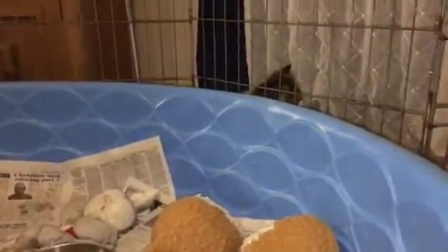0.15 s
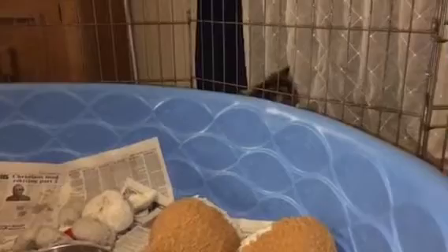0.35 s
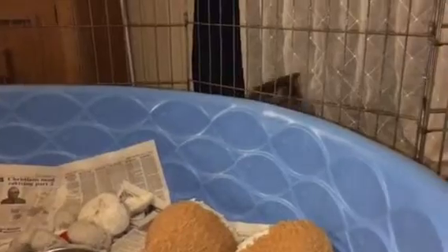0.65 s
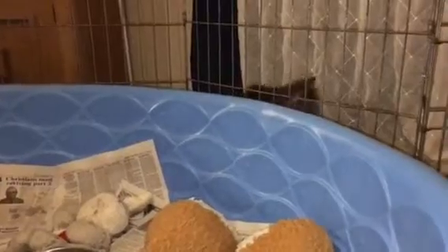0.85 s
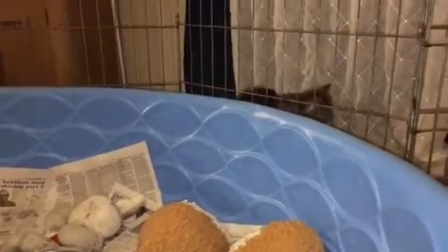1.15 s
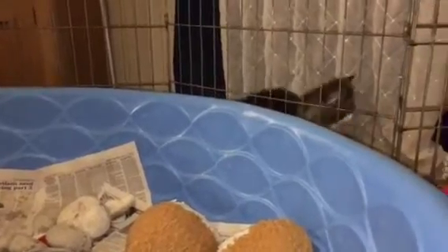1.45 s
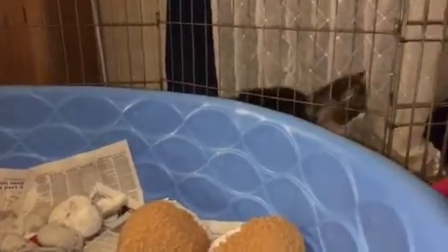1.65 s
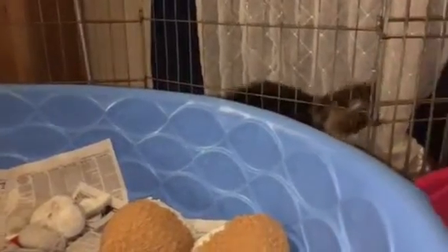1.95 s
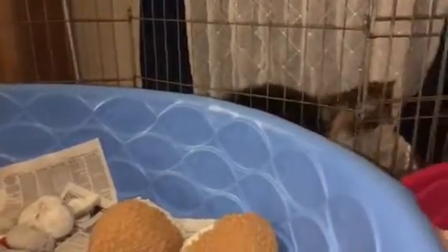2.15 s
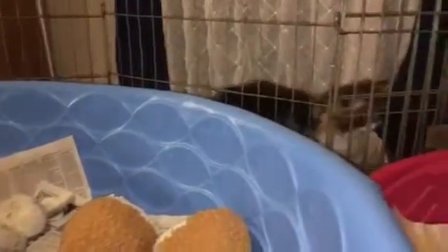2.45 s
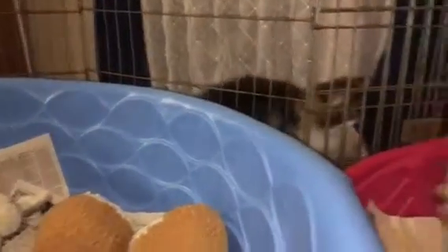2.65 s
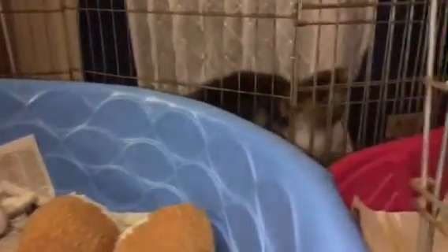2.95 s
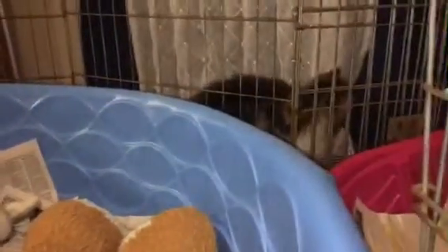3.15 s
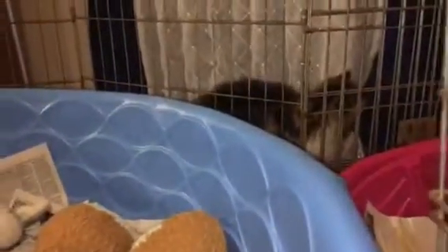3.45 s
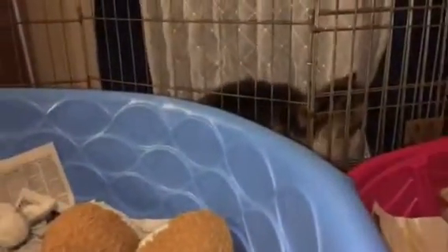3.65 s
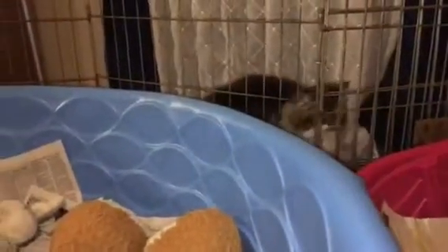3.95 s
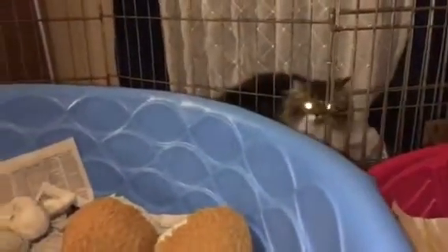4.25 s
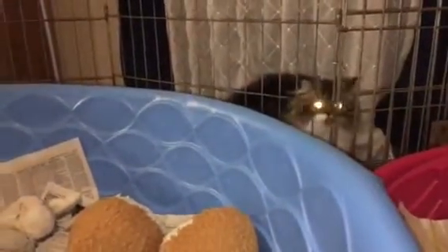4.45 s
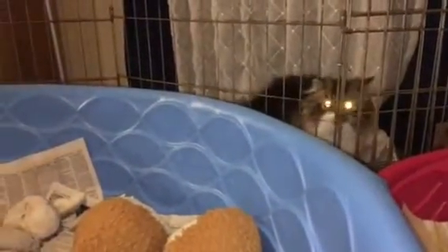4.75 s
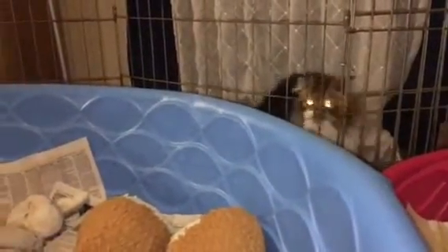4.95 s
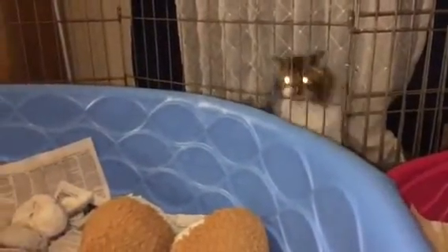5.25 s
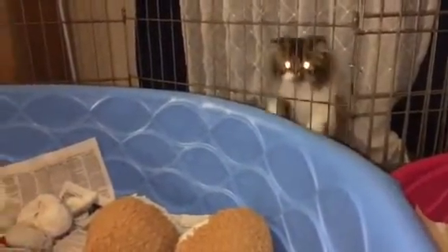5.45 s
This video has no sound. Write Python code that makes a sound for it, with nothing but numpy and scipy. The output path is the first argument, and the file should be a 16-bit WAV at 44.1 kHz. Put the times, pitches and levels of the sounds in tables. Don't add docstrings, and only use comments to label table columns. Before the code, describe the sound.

Small animals move unseen on newspaper in a plastic pool indoors. Dry crackles and grainy rustles come thick at first, with soft low thumps and hollow pats. One sharp plastic knock stands out soon after one second. Activity then thins to light rubs and ticks, with a brief crackle later, over faint low hum. A close phone microphone catches it in a small room.

```python
import sys
import numpy as np
from scipy import signal
from scipy.fft import rfft, irfft, next_fast_len
from scipy.io import wavfile
from scipy.ndimage import uniform_filter1d

SR = 44100
rng = np.random.default_rng(int(sys.argv[2]) if len(sys.argv) > 2 else 0)


def store_pcm(level_fs):
    pcm = np.round(np.clip(level_fs, -1, 1) * 32767).astype(np.int16)
    wavfile.write(sys.argv[1], SR, np.atleast_2d(pcm).T)


def voltage_ratio(decibels):
    exponent = np.asarray(decibels, float) / 20
    return 10 ** exponent


N = 246959

# peak_s, level_db, rise_ms, fall_ms, stack_drag_db
SHUFFLES = [(.06, -61.5, 210, 390, -1), (0.316, -49, 39, 145, -2), (.495, -52.5, 41, 66, -5),
            (.67, -62.5, 460, 37, 1.5), (0.819, -55.5, 84, 123, 5), (0.956, -54, 45, 104, -4),
            (1.193, -62.5, 270, 190, 0), (1.428, -61.5, 350, 79, 6.5), (1.643, -55, 27, 275, 0),
            (2.218, -66.5, 370, 57, 0.5), (2.31, -67.5, 94, 450, -4), (2.4, -63.5, 77, 310, -8),
            (.72, -55, 28, 47, 3), (2.49, -68.5, 140, 120, 4.5), (3.278, -71.5, 25, 790, 2.5),
            (3.55, -79, 370, 300, -11), (3.795, -63.5, 270, 190, -3), (3.981, -64, 260, 75, -1.5),
            (4.262, -77, 530, 320, -15), (4.52, -83, 48, 91, -4), (4.6, -77, 82, 120, 0),
            (4.77, -77, 40, 150, -5.5), (5.509, -73, 24, 83, 1), (5.15, -72, 80, 37, 1),
            (2.45, -69, 56, 140, -6), (5.2, -70.5, 126, 89, 5), (5.597, -75.5, 130, 100, 5)]
# peak_s, level_db, rise_ms, fall_ms, fibre_share_db
BRUSHES = [(.05, -63.5, 400, 470, -1.5), (.314, -55, 105, 160, -1.5), (.495, -54, 106, 100, -6.5),
           (.82, -61, 280, 88, -4.5), (.958, -61.5, 100, 110, -3.5), (1.0, -60.5, 200, 14, 0),
           (1.191, -59, 74, 220, -7), (1.428, -60.5, 77, 91, -30), (1.57, -66, 94, 68, -3),
           (1.646, -55.5, 63, 150, -0.5), (2.3, -63.5, 110, 290, -3.5), (2.499, -63, 260, 13, 0.5),
           (2.68, -62.5, 170, 65, -10), (3.212, -60.5, 240, 254, -3.5), (3.67, -61, 100, 120, 0.5),
           (3.795, -62, 300, 180, 0.5), (3.96, -67.5, 270, 230, 1.5), (4.3, -75, 370, 210, 1),
           (4.62, -79, 110, 120, -1), (4.975, -76, 180, 900, -1), (5.285, -68.5, 76, 70, -1),
           (5.2, -67.5, 60, 60, -6), (2.399, -61, 100, 93, -3.5), (4.71, -75.5, 25, 60, -11.5),
           (5.41, -75.5, 60, 72, 1)]
# peak_s, level_db, fall_ms, crisp_share_db, fibre_share_db
JERKS = [(0.143, -51, 65, -3, -0.5), (0.387, -35.5, 28.6, -10, -13), (0.689, -40.5, 40, -3.5, -26),
         (1.485, -60, 61, 11.5, 3), (1.607, -53, 74, -0.5, -2), (1.878, -58.5, 125, -2.5, -5),
         (2.633, -60.5, 57, 5.5, -1.5), (2.718, -72, 400, -14, -27), (2.981, -66, 280, 0, -8),
         (4.695, -61, 21, -10.5, -27), (2.691, -67.5, 21, 5, -10), (5.341, -62.5, 73, 3, -2)]
# sheet_db, crisp_db, fibres_db, stack_db
RESTING_DB = (-81.5, -84.5, -99, -76.5)
# hz, level_db_per_hz
SHEET_COLOUR = [(300, -41), (1000, -8), (1700, 2), (2500, -1), (3500, -6.5), (5000, -10), (8000, -18)]
CRISP_COLOUR = [(2000, -7), (3500, 4), (5000, 2), (7000, -2), (9000, -33.5), (12000, -58.5)]
FIBRE_COLOUR = [(4000, -21), (7500, 1.5), (9500, 4.5), (12500, 0.5), (15800, -3)]
STACK_COLOUR = [(200, 0), (450, -8), (800, -8), (1300, -10), (2500, -50)]
# peak_s, level_db, rise_ms, fall_ms, pitch_hz
CUPPED = [
    (2.3, -58.5, 31, 170, 2540),
    (2.385, -57, 61, 190, 2960),
    (3.5, -77, 190, 130, 5900),
    (2.74, -69.5, 130, 100, 1400),
    (3.22, -63, 98, 90, 4300),
    (3.4, -78, 60, 22, 3200),
    (4.2, -73, 20, 80, 1600),
    (2.3, -60, 23, 60, 1700),
]
# start_s, peak_db, centre_hz, treble_share_db, breadth_octaves
TEARS = [(0.1271, -31.5, 2740, -9, 0.58), (.184, -40, 4250, -8, 0.42), (0.3823, -22, 2550, -6, 0.83),
         (0.6834, -27.5, 3660, -14, 0.3), (0.6917, -30, 1700, 2, 0.85), (0.728, -38, 2140, -21, 0.29),
         (1.0067, -44, 4540, -23, 0.76), (1.1812, -34, 4280, -22.5, .5), (1.4198, -40, 1640, -26, 1),
         (1.871, -37, 2260, -35, 0.94), (2.4115, -38.5, 2200, -29, 0.4), (2.5274, -38, 2400, -19, 0.79),
         (2.5927, -39, 2480, -21, 0.57), (2.631, -41.5, 3500, -20, 0.9), (2.9669, -43, 2870, -20, 0.43),
         (3.6631, -30.5, 2380, 1, .99), (3.7868, -36, 1700, -26, .99), (3.884, -38.5, 2050, -9, 0.94),
         (4.2582, -50.5, 1320, -24.5, 0.39), (5.3362, -41.5, 6140, -16, 0.24),
         (5.4974, -44.5, 1850, -22, 0.84)]
# start_s, peak_db, centre_hz, treble_share_db, breadth_octaves
SNAPS = [(0.0716, -34.5, 2950, -18, 0.38), (0.1502, -35.5, 2240, -28, 0.38), (.258, -37.5, 3500, -22, 0.79),
         (0.3088, -30, 3540, -17, 0.28), (.3256, -28.5, 4170, -21, 0.65), (0.357, -39, 2000, -23, 0.65),
         (0.388, -22.5, 3060, -21, 0.41), (0.4846, -30, 3710, -5, 0.95), (0.5384, -33.5, 3960, -11, 0.57),
         (0.975, -42, 3270, -21, 0.3), (1.216, -26.5, 2120, -15, 0.74), (1.2508, -22.5, 4850, -5.5, 0.26),
         (1.444, -39.5, 1880, -26, 1.1), (1.4785, -23, 5040, -34, 0.69), (1.63, -30, 2220, -24, 0.96),
         (1.69, -27.5, 2780, -19, 0.42), (1.8888, -28.5, 2550, -32, 0.94), (1.911, -40.5, 3250, -12, 0.27),
         (2.4756, -36, 2400, -15, 0.45), (3.8229, -31, 4000, 0, 0.85), (0.695, -29.5, 2400, -16, 0.33),
         (.707, -46, 3200, -19, 0.55), (.718, -44, 2200, -20, 0.53), (2.5926, -38.5, 4500, -19, 0.27),
         (2.967, -43.5, 3280, -16, 0.84), (3.8236, -40.5, 960, -42, 0.69), (3.7883, -46, 854, -40, .6),
         (5.267, -40.5, 1884, -42, 1.1), (4.689, -39.5, 6360, -30, 0.47), (.152, -43, 6500, -10, 0.3),
         (3.928, -39, 4700, -17, 0.5), (4.6887, -37.5, 3500, -19, 0.35), (5.2655, -35.5, 5600, -21.5, 0.47)]
# start_s, peak_db, centre_hz
TICKS = [(.0044, -43, 3280), (0.095, -44, 3980), (0.191, -40.5, 2330), (0.292, -42, 3260),
         (0.99, -46.5, 4500), (1.927, -47, 2840), (1.2982, -45.5, 1520), (1.373, -44.5, 3660),
         (1.605, -45, 2260), (2.195, -48.5, 2600), (2.8772, -54, 3500), (3.271, -47, 1860),
         (3.7278, -49, 1880), (3.7748, -49.5, 1500), (3.964, -48.5, 1650), (4.238, -55, 3300),
         (0.03, -51, 3600), (0.082, -47, 2100), (0.133, -39.5, 3500), (0.2603, -45.5, 1900),
         (0.373, -47, 3500), (.397, -32.5, 3540), (0.616, -51, 1500), (0.7965, -49, 903),
         (0.952, -37.5, 2090), (1.108, -49.5, 1080), (1.3423, -54, 840), (1.78, -51, 1800),
         (1.947, -54, 1350), (2.0985, -53, 3600), (2.108, -54, 2500), (2.157, -55, 1340),
         (2.378, -47, 3790), (2.49, -60, 3000), (2.6372, -43, 1730), (2.9546, -57, 1040),
         (3.027, -50, 2020), (3.3046, -52, 1660), (3.6106, -54, 5300), (3.81, -43, 2600),
         (3.916, -53, 1690), (3.933, -52, 1000), (3.963, -47, 5500), (4.172, -57, 1540), (4.2403, -57, 910),
         (4.266, -58, 2470), (4.567, -58, 1630), (4.7595, -66, 1190), (5.246, -58, 1810),
         (5.588, -57, 1500), (5.596, -61, 2000)]
# start_s, peak_db, centre_hz, treble_share_db, breadth_octaves
MORE_SNAPS = [(.2948, -41, 2700, -15, .4), (.3265, -35, 2200, -18, .5), (.3312, -34, 3000, -6, 0.53),
              (0.3538, -35, 2400, -23, .6), (.3905, -27, 2830, -15, 0.69), (0.3942, -25, 2500, -20, 0.6),
              (0.4076, -33, 3000, -18, .7), (1.2487, -40, 4500, -11, .3), (1.416, -44, 6000, -18, 0.35),
              (1.612, -38, 2610, -25, 0.43), (1.635, -34, 2000, -22, 0.59), (.3, -36, 5000, -10, .6),
              (4.699, -49, 2190, -21.5, .6), (5.5005, -51, 2196, -27, 0.35), (4.259, -56, 3400, -28, 0.21)]
# start_s, peak_db, pitch_hz, push_ms, t60_s
THUMPS = [(0.364, -44, 96, 24, 0.25), (0.623, -44.5, 135, 16, 0.073), (0.735, -26.5, 92.4, 26, 0.18),
          (0.739, -28, 140.6, 42, 0.054), (.795, -36, 150.4, 38, 0.22), (1.01, -43, 114, 12, .08),
          (1.298, -45, 131, 13, 0.091), (1.223, -41, 150, 20, 0.077), (0.876, -45.5, 145.3, 110, 0.15),
          (1.017, -33, 86.2, 41, 0.09), (1.013, -43, 143, 23, 0.15), (1.091, -46, 77, 16, 0.088),
          (1.192, -27.5, 116.4, 16.5, 0.18), (1.183, -32, 198, 16, 0.2), (1.193, -47, 52, 11, 0.57),
          (1.338, -38, 151.8, 57, 0.07), (1.371, -41, 102, 22, 0.11), (1.501, -40, 66, 12, 0.077),
          (1.684, -37, 143, 17, 0.18), (1.691, -45.5, 97.5, 40, .15), (1.828, -36, 87, 6.2, 0.039),
          (1.864, -38.5, 58, 15, 0.16), (2.064, -49, 92, 17, 0.081), (2.35, -47.5, 66.6, 18, 0.16),
          (2.839, -51.5, 53.5, 30, 0.15), (5.321, -44.5, 119, 8.9, 0.18)]
# start_s, peak_db, centre_hz, spread_octaves, push_ms
PATS = [(0.305, -44, 606, 0.85, 17), (0.384, -47, 330, 0.54, 4.3), (0.707, -35.5, 260, 0.46, 2.9),
        (0.735, -30.5, 233, 0.36, 7.6), (.776, -37, 350, 0.48, 14), (1.011, -41, 301, 0.13, 10.5),
        (1.257, -39.5, 237, 0.2, 7), (1.339, -33, 230, 0.54, 4.9), (1.677, -40.5, 250, 0.23, 12),
        (1.825, -44.5, 274, 0.23, 8.7), (2.344, -49, 250, 0.6, 8.4), (3.783, -48, 284, 0.64, 8.5),
        (5.188, -45, 450, 0.82, 4.6), (5.197, -54.5, 706, 0.27, 5), (5.321, -45.5, 230, 0.21, 3.4)]
# hz, level_db, t60_s
POOL_MODES = [(197.4, 9.5, 0.05), (250, 3.5, 0.11), (321, 4.5, 0.12), (350, 4, 0.11), (397, 1.5, 0.078),
              (502, 0.5, 0.058), (632, 8, 0.071), (734, 1, 0.016), (1040, 7.5, 0.049)]
# start_s, peak_db
KNOCKS = [
    (1.1798, -22.5),
    (1.181, -12),
]
# hz, level_db, t60_s
RIM_MODES = [(1090, 14.5, 0.0092), (336.6, -5, 0.076), (415, 4, 0.025), (532, 3.5, 0.018),
             (710, -6.5, 0.05), (840, 3.5, 0.035), (932, 0, 0.018), (1259, -2.5, 0.036), (1400, -6, 0.06),
             (1666, -3, 0.067), (1900, -8, .06), (2230, -8, 0.05), (2557, -10, 0.052), (3500, -17.5, 0.012)]
# hz, level_db_per_hz
RATTLE_COLOUR = [(400, -22.5), (750, 6.5), (1400, -4.5), (2500, -12.5), (4000, -36)]
# time_s, level_db
SHIFT = [(0.0, -66), (0.09, -61), (0.69, -58), (0.86, -47.5), (1.32, -53.5), (1.48, -54), (1.79, -53.5),
         (2.09, -60.5), (2.34, -62), (2.57, -57), (3.32, -66), (4.6, -65), (4.73, -62), (5.19, -63.5),
         (5.6, -69)]
# hz, level_db_per_hz
FLEX_COLOUR = [(20, -15), (45, 0.5), (90, 1), (150, -3), (300, -12.5), (500, -42.5)]
# hz, level_db_per_hz
AIR_COLOUR = [(15, -83), (30, -8.5), (55, 5), (150, -9.5), (400, -7.5), (1500, -26.5), (3000, -30),
              (7000, -24.5), (16000, -36)]
# hz, level_db
HUM = (119.9, -64)
# hz, t60_s
WALLS = [(100, 1), (500, 0.2), (2000, 0.23), (6000, 0.059), (14000, 0.22)]
# hz, gain_db
MIC = [(4300, 0), (4900, -3), (5500, 0), (9700, 0), (10500, -6), (11300, 0), (15700, 0), (15900, -20),
       (16500, -24), (16700, -60)]


def slide(slips_per_s=4500, spread_db=1.1, hiss=2.0, clump_db=1.0):
    slip_gain = voltage_ratio(spread_db * np.minimum(rng.exponential(1, N), 4))
    slips = slip_gain * (rng.random(N) < slips_per_s / SR)
    rub = evened(slips * rng.standard_normal(N)) + hiss * rng.standard_normal((4, N))
    rub *= voltage_ratio(clump_db * wander(0.013))

    sheet = [row[:4] for row in SHUFFLES]
    crisp = [row[:4] for row in BRUSHES]
    fibres = [(s, db + share_db, rise, fall) for s, db, rise, fall, share_db in BRUSHES]
    slower = 1.7
    stack = [(s, db + drag_db, slower * rise, slower * fall)
             for s, db, rise, fall, drag_db in SHUFFLES]
    for s, db, fall, crisp_db, fibre_db in JERKS:
        rise = 0.2 * fall
        sheet.append((s, db, rise, fall))
        crisp.append((s, db + crisp_db, rise, fall))
        fibres.append((s, db + fibre_db, rise, fall))
        stack.append((s, db - 4.5, rise, fall))

    motions = (sheet, crisp, fibres, stack)
    colours = (SHEET_COLOUR, CRISP_COLOUR, FIBRE_COLOUR, STACK_COLOUR)
    out = np.zeros(N)
    for grain, rows, rest_db, points in zip(rub, motions, RESTING_DB, colours):
        out += strokes(rows, rest_db) * colour(grain, points)
    return out


def cupped(skirt_db=-10):
    grain = voltage_ratio(1.6 * wander(0.0025)) * rng.standard_normal((len(CUPPED), N))
    half_octave = np.sqrt(2)
    out = np.zeros(N)
    for (*stroke, hz), rub in zip(CUPPED, grain):
        hollow = [(hz / 2, 3 * skirt_db), (hz / half_octave, skirt_db), (hz, 0),
                  (hz * half_octave, skirt_db), (hz * 2, 3 * skirt_db)]
        out += strokes([stroke], -np.inf) * colour(rub, hollow)
    return out


def snaps(treble_hz=6000, front_s=0.0008, settle_s=0.006):
    snap_settle_db = -16
    creases = [(*row, -6.5) for row in TEARS]
    creases += [(*row, snap_settle_db) for row in SNAPS]
    creases += [(s, db, centre_hz, -39.5, 0.61, -1.5) for s, db, centre_hz in TICKS]
    creases += [(*row, snap_settle_db) for row in MORE_SNAPS]

    out, t = np.zeros(N), np.arange(3000) / SR
    hz = np.fft.rfftfreq(4096, 1 / SR) + 1
    for s, db, centre_hz, treble_db, breadth, settle_db in creases:
        noise = rng.standard_normal(len(t))
        front = (noise + 3.5 * (t == 0)) * np.exp(-t / front_s)
        burst = front + voltage_ratio(settle_db) * noise * np.exp(-t / settle_s)
        body = np.exp(-0.5 * (np.log2(hz / centre_hz) / breadth) ** 2)
        edge = voltage_ratio(treble_db) / (1 + (treble_hz / hz) ** 4) / (1 + (hz / 13000) ** 4)
        snap = np.roll(irfft(rfft(burst, 4096) * (body + edge)), 44)
        add(out, s - 0.001, voltage_ratio(db) * snap / abs(snap).max())
    return out


def thumps(swell_cycles=0.97):
    out, t = np.zeros(N), np.arange(SR // 2) / SR
    for s, db, hz, push_ms, t60_s in THUMPS:
        swell = np.minimum(t * hz / swell_cycles, 1)
        dying_db = -60 * np.maximum(t - push_ms / 1000, 0) / t60_s
        add(out, s, -voltage_ratio(db + dying_db) * swell * np.sin(2 * np.pi * hz * t))
    return out


def pats(pad_ring=0.76, rise_s=0.0061):
    out, t = np.zeros(N), np.arange(SR // 2) / SR
    hz, mode_db, t60_s = np.transpose(POOL_MODES)[:, :, None]
    for s, db, centre_hz, spread, push_ms in PATS:
        turn = rng.random((len(POOL_MODES), 1))
        share = voltage_ratio(mode_db) * np.exp(-0.5 * (np.log2(hz / centre_hz) / spread) ** 2)
        dying = voltage_ratio(-60 * np.maximum(t - 0.00127 * push_ms, 0) / (pad_ring * t60_s))
        modes = share * dying * np.sin(2 * np.pi * (hz * t + 0.5 * turn))
        pat = modes.sum(0) * np.minimum(t / rise_s, 1)
        add(out, s, voltage_ratio(db) * pat / abs(pat).max())
    return out


def knock(rattle_db=-3.5, rattle_t60_s=0.098, rise_s=0.0006):
    out, t = np.zeros(N), np.arange(SR // 4) / SR
    ring = sum(voltage_ratio(db - 60 * t / t60_s) * np.sin(2 * np.pi * hz * t) for hz, db, t60_s in RIM_MODES)
    rattle = colour(rng.standard_normal(len(t)), RATTLE_COLOUR)
    ring += voltage_ratio(rattle_db - 60 * t / rattle_t60_s) * rattle
    ring *= np.minimum(t / rise_s, 1)
    for s, db in KNOCKS:
        add(out, s, voltage_ratio(db) * ring / abs(ring).max())
    return out


def shifting():
    s, level_db = np.transpose(SHIFT)
    flex = colour(rng.standard_normal(N), FLEX_COLOUR) * voltage_ratio(5.54 * wander(0.041))
    return voltage_ratio(np.interp(np.arange(N) / SR, s, level_db) - 5.0) * flex


def stillness(air_db=-69.5):
    air = colour(rng.standard_normal(N), AIR_COLOUR) * voltage_ratio(air_db + 2.0 * wander(0.27))
    hum_hz, hum_db = HUM
    hum_gain = np.sqrt(2) * voltage_ratio(hum_db + 0.81 * wander(0.097))
    return air + hum_gain * np.sin(2 * np.pi * hum_hz * np.arange(N) / SR)


def room(x, gap_s=0.0077):
    taps = np.zeros(SR // 2)
    at = np.arange(0, SR // 2 - 20, 20)
    taps[at + rng.integers(0, 20, len(at))] = rng.choice([-1., 1.], len(at))
    hz, t, z = signal.stft(taps, SR, nperseg=256)
    decay = voltage_ratio(-60 * t / read(WALLS, hz)[:, None])
    tail = signal.istft(z * decay, SR, nperseg=256)[1]
    tail = np.append(np.zeros(int(gap_s * SR)), tail / np.linalg.norm(tail))
    return signal.fftconvolve(x, tail)[:N]


def strokes(rows, rest_db):
    t = np.arange(0, N + 32, 32) / SR
    s, db, rise_ms, fall_ms = np.transpose(rows)[:, :, None]
    away = 1000 * np.maximum((s - t) / np.maximum(rise_ms, 2), (t - s) / np.maximum(fall_ms, 2))
    power = (voltage_ratio(db - 20 * away) ** 2).sum(0) + voltage_ratio(rest_db) ** 2
    return np.interp(np.arange(N) / SR, t, np.sqrt(power))


def wander(seconds):
    size = max(int(seconds * SR), 2)
    return evened(uniform_filter1d(uniform_filter1d(rng.standard_normal(N), size), size))


def colour(x, points):
    size = next_fast_len(len(x))
    gain = voltage_ratio(read(points, np.fft.rfftfreq(size, 1 / SR)))
    return evened(irfft(rfft(x, size) * gain, size)[:len(x)])


def evened(x):
    return x / np.sqrt(np.mean(x ** 2) + 1e-20)


def read(points, hz):
    f, value = np.transpose(points)
    return np.interp(np.log(hz + 1), np.log(f + 1), value)


def add(mix, s, sound):
    part = mix[max(round(s * SR), 0):][:len(sound)]
    part += sound[:len(part)]


def scene():
    crackle, rap = snaps(), knock()
    echo = room(voltage_ratio(-13) * crackle + voltage_ratio(-13.5) * rap)
    paper = slide() + cupped() + crackle
    pool = thumps() + pats() + rap + shifting()
    return (paper + pool + echo + stillness())[None]


def low_pass(x):
    return signal.sosfilt(signal.butter(12, 16650, fs=SR, output="sos"), x)


def record(dry):
    size = next_fast_len(N)
    port = voltage_ratio(read(MIC, np.fft.rfftfreq(size, 1 / SR)))
    heard = irfft(rfft(dry, size) * port, size)[:, :N]
    return low_pass(heard)


dry = scene()
out = record(dry)
store_pcm(out)
```